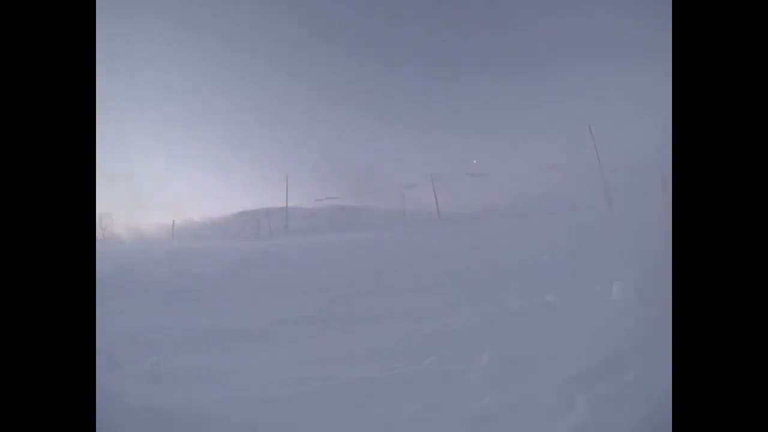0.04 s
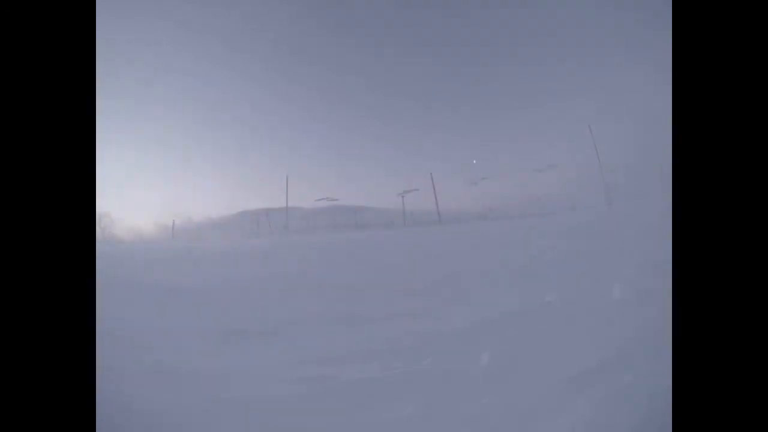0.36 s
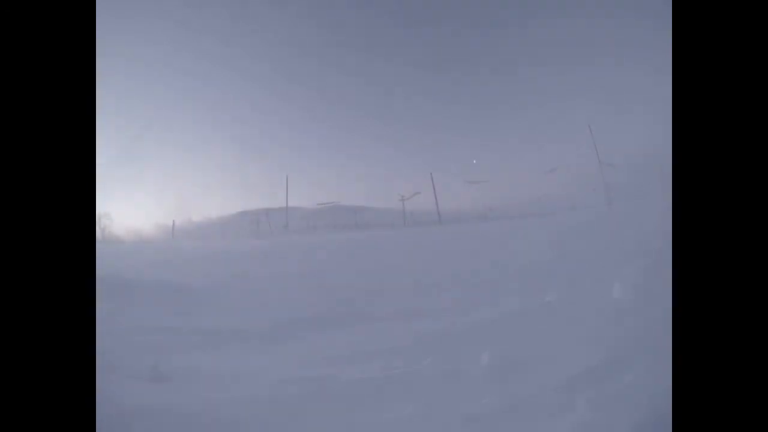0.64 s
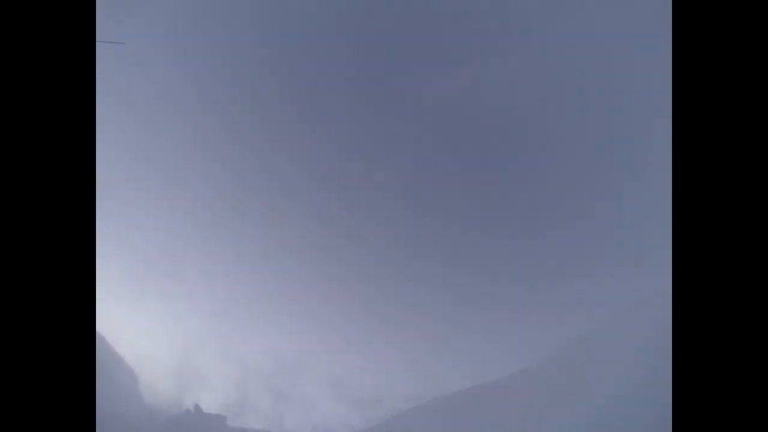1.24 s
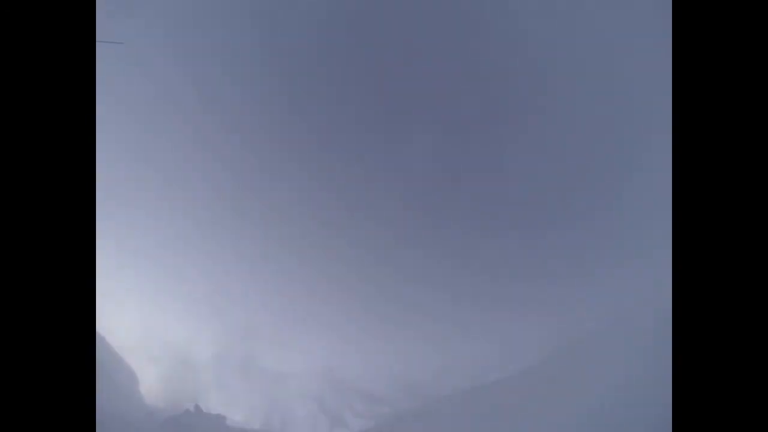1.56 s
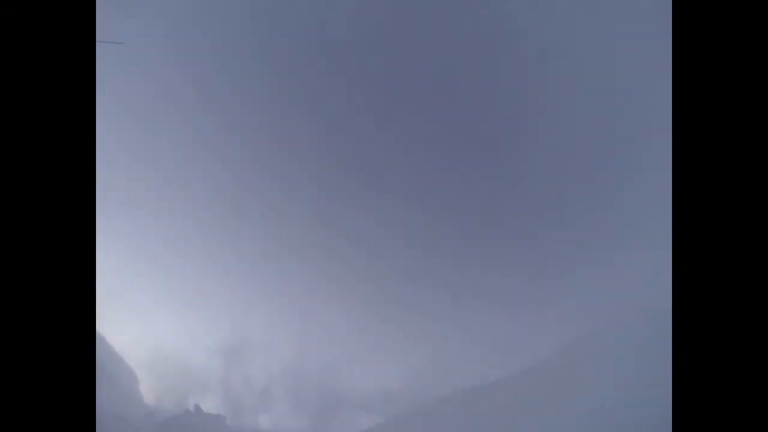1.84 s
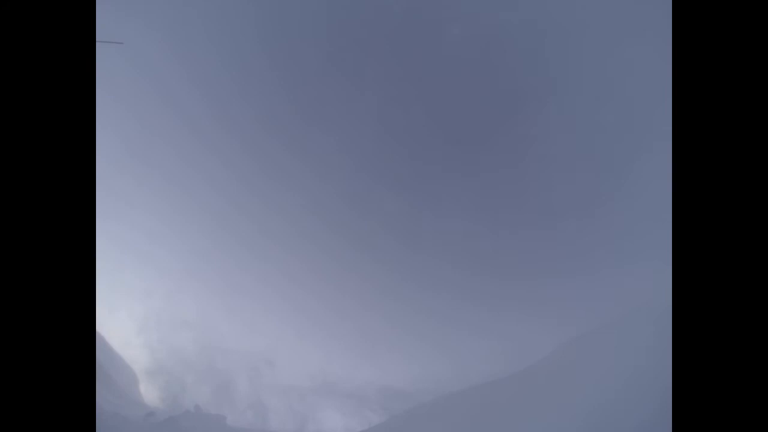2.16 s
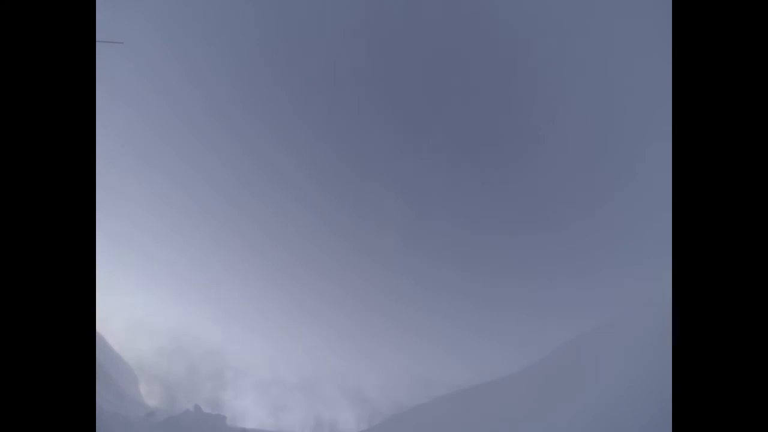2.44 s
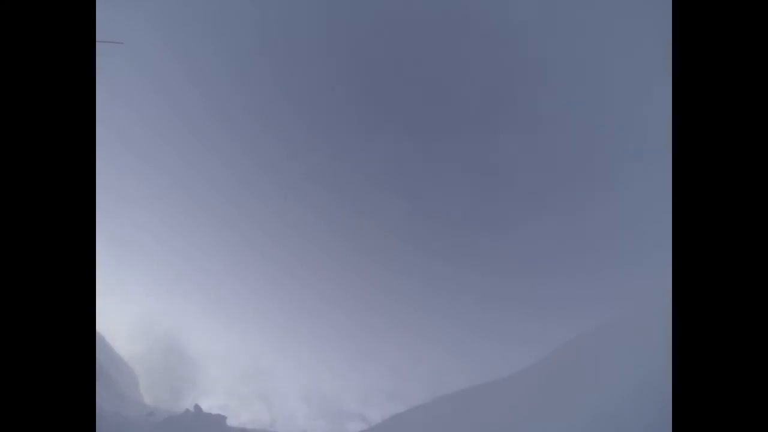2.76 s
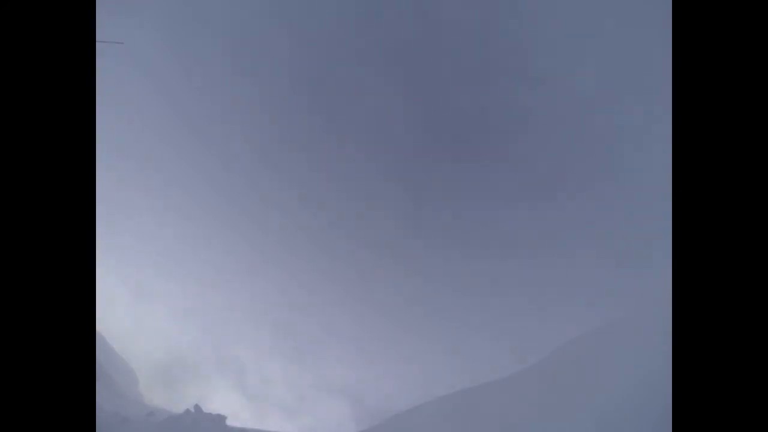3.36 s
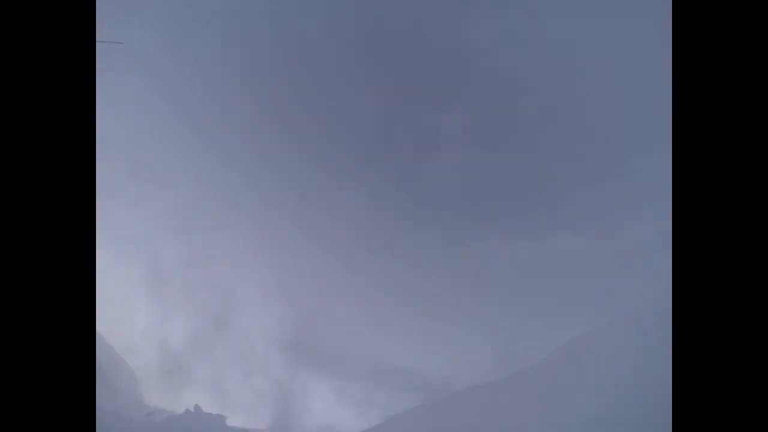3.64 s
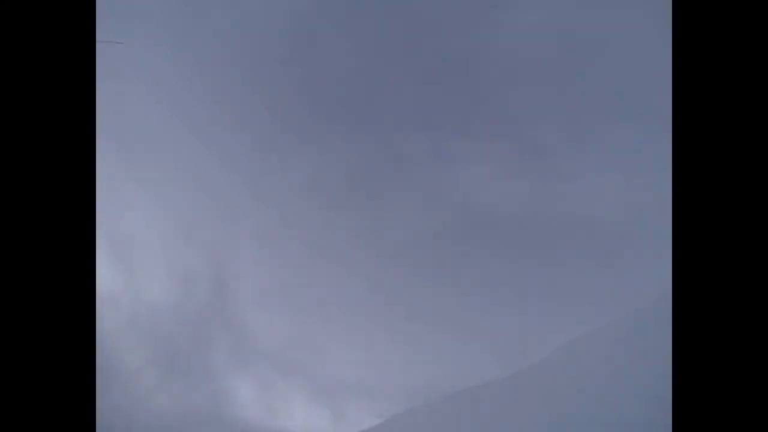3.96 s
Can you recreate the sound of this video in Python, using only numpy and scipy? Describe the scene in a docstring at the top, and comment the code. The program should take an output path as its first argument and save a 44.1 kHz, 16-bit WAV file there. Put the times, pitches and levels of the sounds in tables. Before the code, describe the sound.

Snow grains pelt the microphone housing in a dense, crackling spray, followed by softer hissing drifts that ease briefly and return. Sharp little ice ticks and a low wind rumble come through, outdoors on open snow with no echo.

```python
"""A thick spray of snow grains rattles on a microphone housing lying in an open field.
Then thinner wind-driven drifts hiss by in gusts, with flurries and a lull near three seconds.
Single ice grains tick and set the shell ringing; one soft clump lands with a dull puff.
Eddies rumble at the port, and far wind murmurs behind."""
import sys
import numpy as np
from scipy import signal
from scipy.fft import rfft, irfft
from scipy.io import wavfile

SR = 44100
rng = np.random.default_rng(int(sys.argv[2]) if len(sys.argv) > 2 else 0)


def int16_out(signal):
    """Quantize to a 16-bit WAV file."""
    q = np.round(np.clip(np.atleast_2d(signal).T, -1, 1) * 32767)
    wavfile.write(sys.argv[1], SR, q.astype(np.int16))


N = 176400

# Strength of eddies, drift, spray and its dying tail. Each row: time in seconds, level in dB before trim.
EDDY_LEVELS = [(0.0, -50), (0.04, -76), (0.17, -47.5), (0.34, -65), (0.39, -51), (0.5, -51), (0.53, -62),
               (0.88, -56), (0.91, -53), (0.96, -58), (0.97, -53), (1.19, -52.5), (1.25, -43),
               (1.37, -62.5), (1.47, -48.5), (1.63, -56), (1.85, -48.5), (1.93, -63), (1.99, -41),
               (2.03, -64), (2.27, -52), (2.44, -71), (2.46, -51), (2.48, -58), (3.11, -70), (3.51, -62),
               (3.62, -45.5), (3.69, -53.5), (3.72, -56.5), (3.87, -62), (3.98, -48.5), (4.0, -43.5)]
DRIFT_LEVELS = [(0.72, -74), (0.84, -54.5), (0.92, -51), (1.12, -55), (1.24, -53), (1.34, -55), (1.6, -58),
                (1.82, -53.5), (1.97, -56), (2.22, -56), (2.33, -59), (2.43, -57), (2.54, -58.5),
                (2.66, -56), (2.73, -58), (2.94, -68.5), (3.21, -69), (3.31, -65), (3.48, -67), (3.6, -61),
                (3.74, -61), (3.88, -64.5), (3.95, -57), (4.0, -53.5)]
SPRAY_LEVELS = [(0.0, -40), (0.012, -40), (0.096, -41.5), (0.154, -34), (0.166, -37), (0.27, -42),
                (0.28, -37.5), (0.338, -39), (0.446, -57), (0.476, -43.5), (0.524, -65.5), (0.546, -50.5),
                (0.658, -53), (0.68, -59)]
SPRAY_TAIL_LEVELS = [(0.694, -59), (0.703, -42.5), (0.74, -50), (0.775, -54), (0.825, -53.5), (0.87, -67),
                     (1.0, -94)]
EDDY_TRIM_DB, DRIFT_TRIM_DB, SPRAY_TRIM_DB = 1.5, 0.5, 1
# Source spectra. Each row: frequency in Hz, relative spectral density in dB.
FAR_WIND_SPECTRUM = [(20, 0), (80, -0.5), (160, 0), (260, -5), (500, -8.5), (900, -12), (1500, -15.5),
                     (3000, -20.5), (6000, -26), (15000, -34.5)]
EDDY_SPECTRUM = [(10, -10), (22, 4.5), (38, -2), (52, -5.5), (80, -7.5), (110, -14.5), (160, -26.5),
                 (250, -31), (500, -48.5), (1500, -87)]
CLUMP_SPECTRUM = [(40, -11), (150, 0), (420, -0.5), (600, -9), (1300, -7), (3000, -28)]
DRIFT_SPECTRUM = [(200, -27), (450, -13.5), (720, -9), (980, -9), (1200, -3.5), (1430, 1), (1750, -4),
                  (2100, -2.5), (2650, -7), (3200, -6.5), (4200, -11), (4850, -10.5), (5800, -16.5),
                  (7500, -22.5), (9500, -19), (11000, -19.5), (13000, -18), (15500, -25)]
FLURRY_SPECTRUM = [(250, -34), (700, -12.5), (1000, -11), (1450, 0), (1750, -1), (2250, 1), (2700, -4),
                   (3200, 1), (3800, -2), (4400, -7.5), (5200, -9.5), (7200, -17.5), (9500, -16.5),
                   (11000, -21), (13000, -17), (15500, -32)]
SPRAY_SPECTRUM = [(200, -33), (420, -34.5), (640, -21), (900, -19), (1180, -14), (1400, -2), (1600, -1),
                  (1880, -7.5), (2200, 1), (2750, -7.5), (3300, -3.5), (4150, -12), (4800, -2),
                  (5700, -11.5), (7400, -17.5), (10800, -14), (13500, -17.5), (15500, -24)]
DRUM_SPECTRUM = [(200, -21), (420, -15.5), (640, -2), (860, -5.5), (1100, 1), (1600, -0.5), (2600, -7.5),
                 (6000, -29)]
# Hard crystals in the snow. Each row: pitch in Hz, level in dB relative to the group's envelope.
DRIFT_PINGS = [(3150, -17.5), (3550, -20.5), (9400, -27.5), (12400, -39), (13200, -32.5)]
SPRAY_PINGS = [(4750, -18), (5000, -18.5), (10400, -19), (11300, -25), (13000, -23)]
# Puffs of coarse grains. Each row: peak time in seconds, half-width in seconds, peak level in dB.
FLURRIES = [(.905, 0.028, -47.5), (.985, 0.009, -58), (1.04, 0.015, -59), (1.165, 0.0081, -53),
            (1.196, 0.013, -48), (1.25, 0.01, -53), (1.297, 0.0068, -51), (1.395, 0.011, -56),
            (1.553, 0.028, -53.5), (1.737, 0.012, -54.5), (1.84, 0.017, -54), (1.89, 0.025, -57.5),
            (2.115, 0.019, -55.5), (2.227, 0.015, -46.5), (2.44, 0.016, -58.5), (2.583, .013, -53),
            (2.635, 0.013, -48.5), (2.675, 0.0091, -52.5), (3.581, 0.006, -59.5), (3.744, 0.028, -58),
            (3.968, 0.022, -53)]
# Single ice grains. Each row: start in seconds, blow on the shell in dB, crack in dB,
# own ring in dB, own pitch in Hz.
ICE_TICKS = [(0.0095, -40, -36, -31, 4800), (0.0433, -37, -38, -24.5, 4830),
             (0.0544, -24.5, -31, -30, 4800), (0.1000, -28, -25, -32, 11000), (0.1623, -26, -33, -31, 2400),
             (0.3395, -29, -22, -34, 2500), (0.3803, -25.5, -28, -37, 3440), (0.394, -31, -36, -28, 4860),
             (0.4039, -38, -41, -33, 3700), (0.6985, -25.5, -30, -24.5, 4850),
             (0.7137, -40, -46, -30, 4800), (0.7951, -31, -29.5, -26, 3370), (0.8250, -52, -54, -37, 4800),
             (1.244, -40, -50, -41, 4940), (1.6350, -29, -54, -45, 5100), (1.878, -45, -52, -39, 3100),
             (2.162, -46, -53, -39.5, 3300), (2.2803, -38, -51, -44, 3200), (2.4521, -35, -51, -42, 3220),
             (2.5857, -39, -48, -35.5, 2980), (2.9660, -45, -57.5, -39.5, 12400),
             (3.1720, -36.5, -45, -45, 12200), (3.2980, -66, -66, -50, 13000),
             (3.6570, -64, -64, -47, 13200), (3.7580, -38, -46, -47, 3850), (3.8470, -49, -52, -37.5, 3240),
             (3.9403, -40, -54, -42, 3160), (3.963, -52, -56, -41.5, 13200)]
# Shell resonances. Each row: frequency in Hz, gain in dB, T60 in seconds.
SHELL_MODES = [(1380, -16.5, 0.019), (2120, -4.5, 0.0028), (3300, -30, .003), (4850, -25, 0.0019)]


def from_db(db):
    """Decibels to gain."""
    return 10 ** (np.asarray(db) / 20)


def unit_rms(x):
    """Scale to rms 1."""
    return x / np.sqrt(np.mean(x ** 2) + 1e-20)


def envelope(rows):
    """Join (seconds, value) rows by straight lines."""
    return np.interp(np.arange(N) / SR, *np.transpose(rows))


def wander(corner_hz):
    """Low-passed random motion, rms about 1."""
    hop, warmup = 40, 2000
    pole = np.exp(-2 * np.pi * corner_hz * hop / SR)
    noise = rng.standard_normal(N // hop + warmup + 2)
    slow = signal.lfilter([1], [1, -2 * pole, pole * pole], noise)[warmup:]
    return np.interp(np.arange(N) / hop, np.arange(len(slow)), unit_rms(slow))


def coloured(x, spectrum):
    """Minimum-phase filter of the given (Hz, dB) shape; output rms 1."""
    hz, db = np.transpose(spectrum)
    bins_hz = np.maximum(np.arange(N // 2 + 1) * SR / N, 1)
    gain = from_db(np.interp(np.log(bins_hz), np.log(hz), db))
    cepstrum = irfft(np.log(gain), N)
    cepstrum[1:N // 2] *= 2
    cepstrum[N // 2 + 1:] = 0
    return unit_rms(irfft(rfft(x) * np.exp(rfft(cepstrum)), N))


def shaped_noise(spectrum):
    """Gaussian noise of the given spectrum, rms 1."""
    return coloured(rng.standard_normal(N), spectrum)


def ring(clicks, hz, t60_s):
    """Band-pass resonance; a unit click rings at a height of about 1."""
    radius = from_db(-60 / (t60_s * SR))
    angle = 2 * np.pi * hz / SR
    poles = [1, -2 * radius * np.cos(angle), radius * radius]
    return signal.lfilter([1, 0, -1], poles, clicks + 1e-18) / (1 + radius)


def click(start_s, db):
    """One impulse."""
    return from_db(db) * (np.arange(N) == int(start_s * SR))


def grains(per_s, size_db, colour_db, bunch_db, powder_low, powder_high):
    """Bunched impacts, each of its own size and colour, over the hiss of fine powder; rms 1."""
    arrivals = rng.random(N) < per_s / SR
    spread_db = size_db * np.minimum(rng.exponential(1, N), 4)
    sizes = arrivals * from_db(spread_db + bunch_db * wander(70))
    edges_hz = np.geomspace(250, 17000, 9)
    powder_gains = np.linspace(powder_low, powder_high, len(edges_hz) - 1)
    out = 0
    for low_hz, high_hz, powder in zip(edges_hz, edges_hz[1:], powder_gains):
        signs = rng.choice([-1, 1], N)
        hits = unit_rms(sizes * signs * from_db(colour_db * rng.uniform(-0.5, 1, N)))
        drive = unit_rms(hits + powder * rng.standard_normal(N))
        band = signal.butter(2, [low_hz, high_hz], "band", fs=SR, output="sos")
        out = out + signal.sosfilt(band, drive)
    return unit_rms(out)


def pings(pitches, per_s=45, t60_cycles=30, size_db=4.5):
    """Sparse hard crystals, each ringing briefly at one of the pitches."""
    out = 0
    for hz, db in pitches:
        arrivals = rng.random(N) < per_s / SR
        sizes = arrivals * from_db(size_db * np.minimum(rng.exponential(1, N), 3))
        out = out + from_db(db) * unit_rms(ring(sizes, hz, t60_cycles / hz))
    return out


def far_wind(level_db=-65.5):
    """Steady murmur of distant wind."""
    return from_db(level_db) * shaped_noise(FAR_WIND_SPECTRUM)


def eddies(flutter_db=1.0):
    """Lumpy eddies rumble at the port."""
    level_db = EDDY_TRIM_DB + envelope(EDDY_LEVELS) + flutter_db * wander(20)
    return from_db(level_db) * shaped_noise(EDDY_SPECTRUM)


def clump(start_s=0.829, level_db=-50.5, t60_s=0.06):
    """Soft snow lands on the housing: a dull, short puff."""
    age_s = np.arange(N) / SR - start_s
    fade_db = -60 * np.abs(age_s) / t60_s
    return (age_s > 0) * from_db(level_db + fade_db) * shaped_noise(CLUMP_SPECTRUM)


def drift(flutter_db=0.5):
    """Fine snow streams past with the wind, hissing in the hollow of the port."""
    impacts = grains(per_s=5000, size_db=5.5, colour_db=10.5, bunch_db=2.7,
                     powder_low=1.5, powder_high=0.38)
    level_db = DRIFT_TRIM_DB + envelope(DRIFT_LEVELS) + flutter_db * wander(27)
    return from_db(level_db) * (coloured(impacts, DRIFT_SPECTRUM) + pings(DRIFT_PINGS))


def flurries(rise_share=0.54):
    """Each puff of coarse grains swells, then falls away a little faster."""
    time_s = np.arange(N) / SR
    power = 0
    for peak_s, half_width_s, db in FLURRIES:
        flank_s = 2 * half_width_s * np.where(time_s < peak_s, rise_share, 1 - rise_share)
        power = power + from_db(db) ** 2 * np.exp(-((time_s - peak_s) / flank_s) ** 2)
    impacts = grains(per_s=3500, size_db=3.9, colour_db=6.5, bunch_db=1.0,
                     powder_low=0.9, powder_high=0.35)
    return np.sqrt(power) * coloured(impacts, FLURRY_SPECTRUM)


def ice_ticks(t60_cycles=23.6):
    """Each ice grain cracks, rings at its own pitch and sets the shell ringing."""
    blows = cracks = grain_rings = 0
    for start_s, blow_db, crack_db, ring_db, hz in ICE_TICKS:
        blows += click(start_s, blow_db)
        cracks += click(start_s, crack_db)
        grain_rings += ring(click(start_s, ring_db), hz, t60_cycles / hz)
    shell = sum(from_db(db) * ring(blows, hz, t60_s) for hz, db, t60_s in SHELL_MODES)
    return shell + ring(cracks, hz=10500, t60_s=0.00029) + grain_rings


def spray(flutter_db=0.46, ref_db=-37, drum_at_ref_db=-49.5, drum_slope=1.03, ping_limit_db=-42):
    """Thick snow rattles on the shell, with a low drumming that rises and falls with it."""
    impacts = grains(per_s=6000, size_db=4.5, colour_db=7.0, bunch_db=1.3,
                     powder_low=1.08, powder_high=0.36)
    level_db = SPRAY_TRIM_DB + envelope([*SPRAY_LEVELS, *SPRAY_TAIL_LEVELS]) + flutter_db * wander(35)
    rattle = from_db(level_db) * coloured(impacts, SPRAY_SPECTRUM)
    drum = from_db(drum_at_ref_db + drum_slope * (level_db - ref_db)) * shaped_noise(DRUM_SPECTRUM)
    ping_db = np.minimum(level_db, ping_limit_db)  # in thicker spray, powder cushions the crystals
    return rattle + drum + from_db(ping_db) * pings(SPRAY_PINGS)


def scene():
    """Snow and wind at one microphone, no echo."""
    return (spray() + drift() + flurries() + ice_ticks() + clump() + eddies() + far_wind())[None]


def record(dry):
    """Steep elliptic low-pass."""
    cutoff_hz = 15500
    return signal.sosfilt(signal.ellip(12, 0.1, 80, cutoff_hz, fs=SR, output="sos"), dry)


dry = scene()
out = record(dry)
int16_out(out)
```